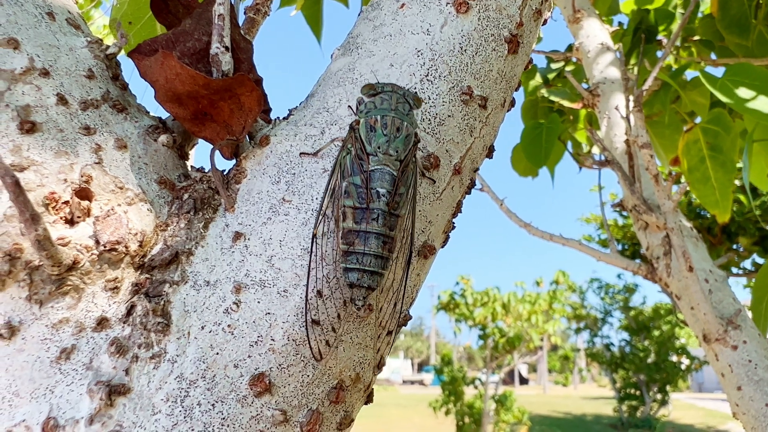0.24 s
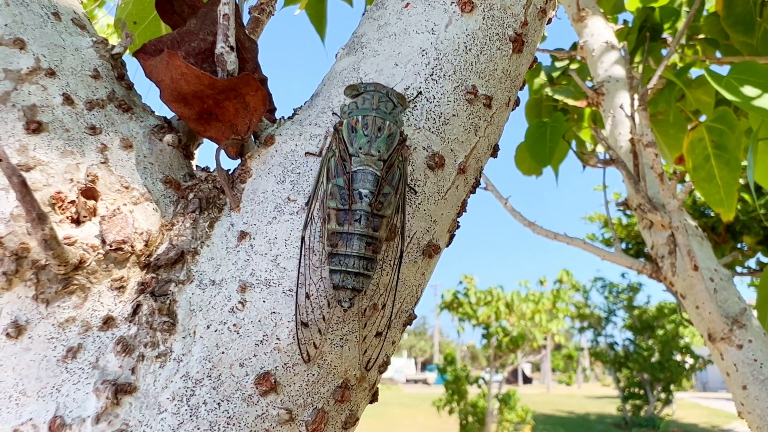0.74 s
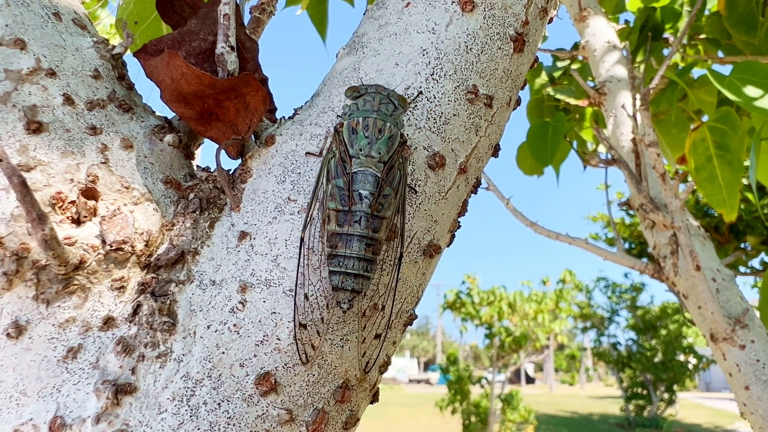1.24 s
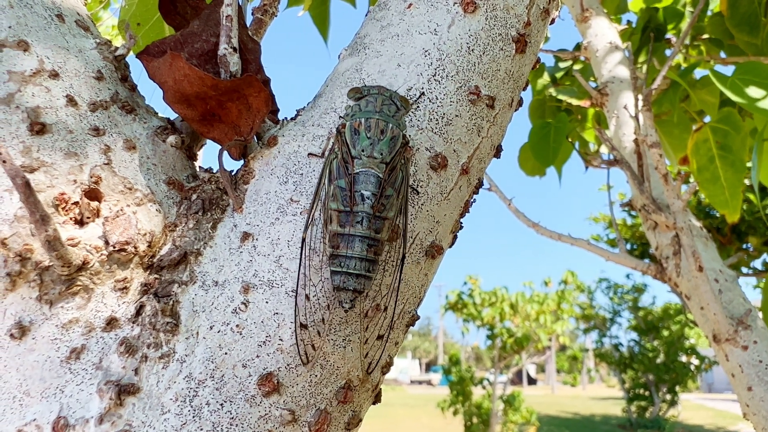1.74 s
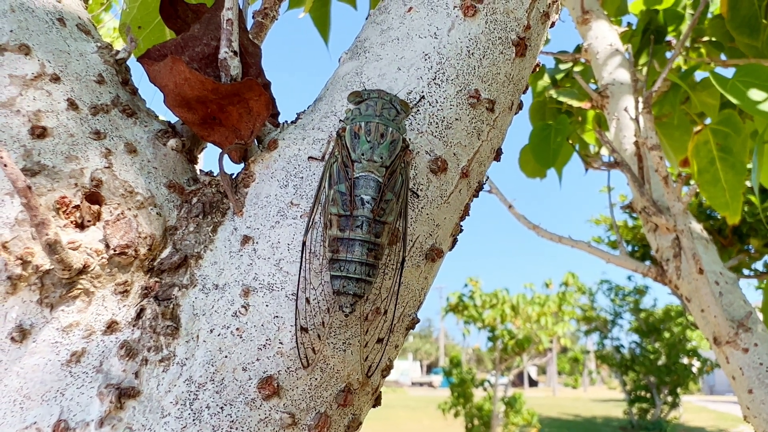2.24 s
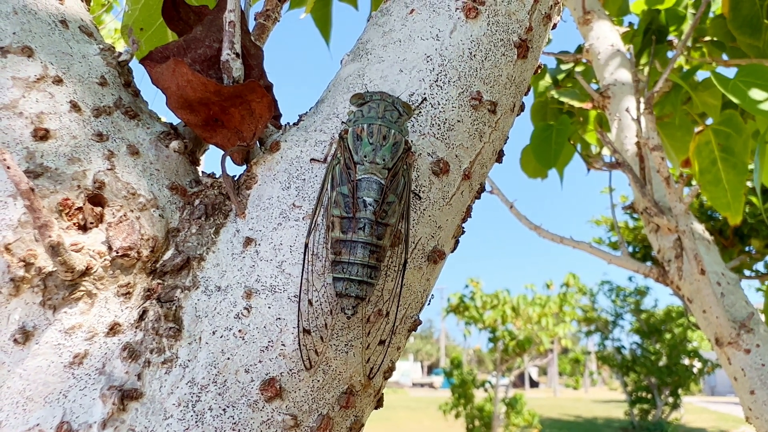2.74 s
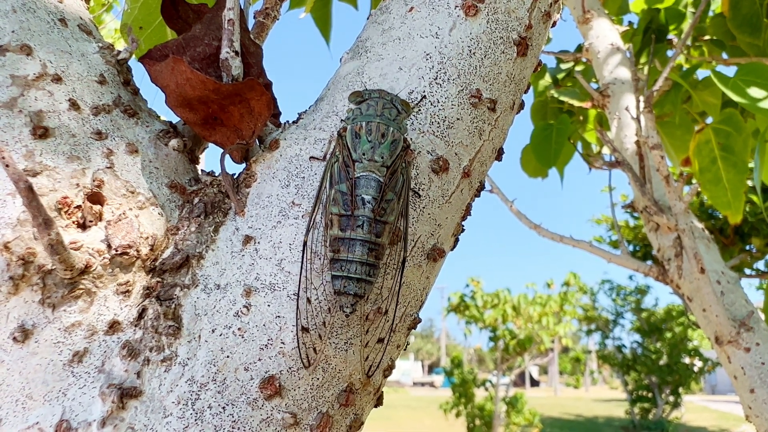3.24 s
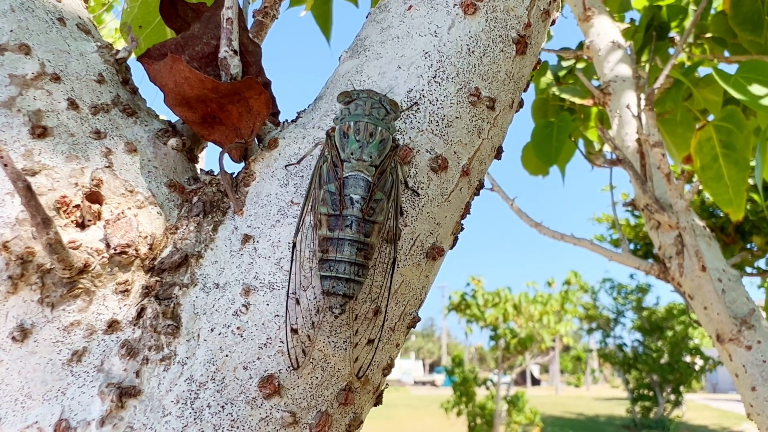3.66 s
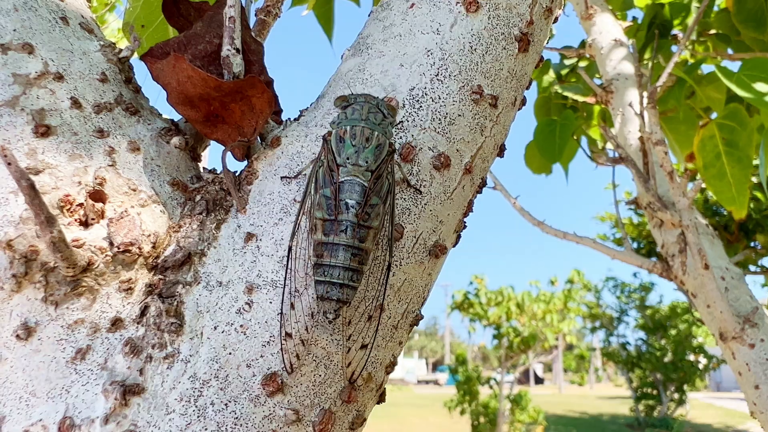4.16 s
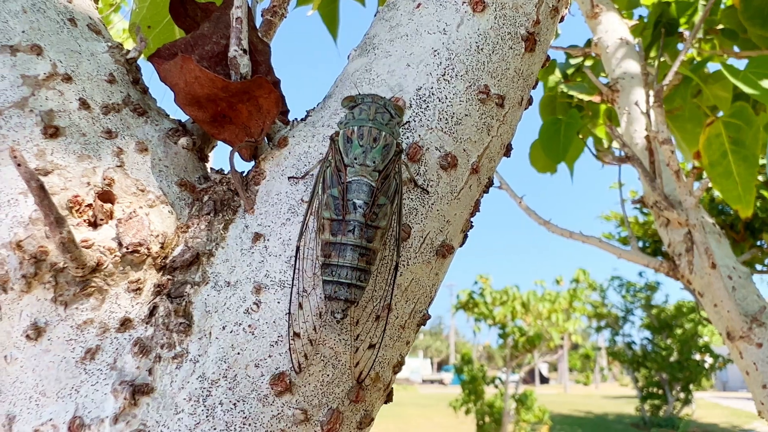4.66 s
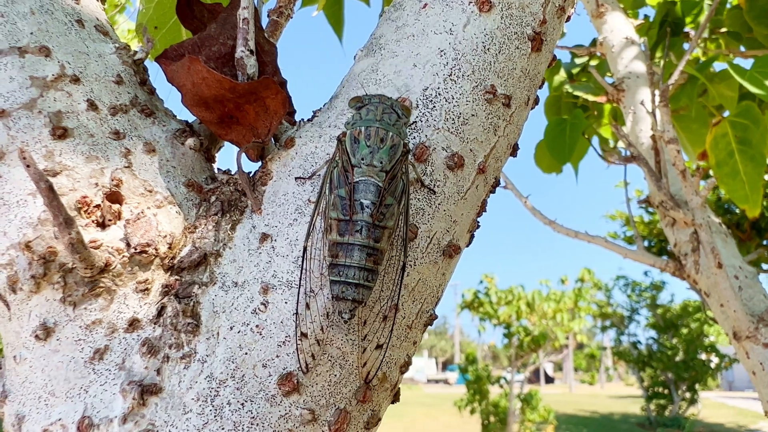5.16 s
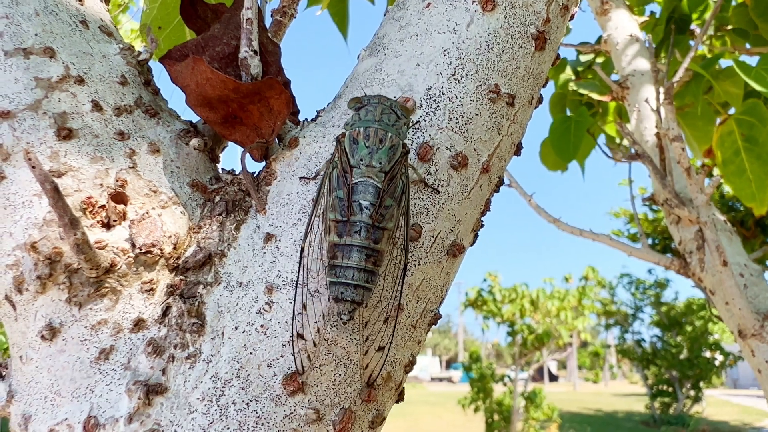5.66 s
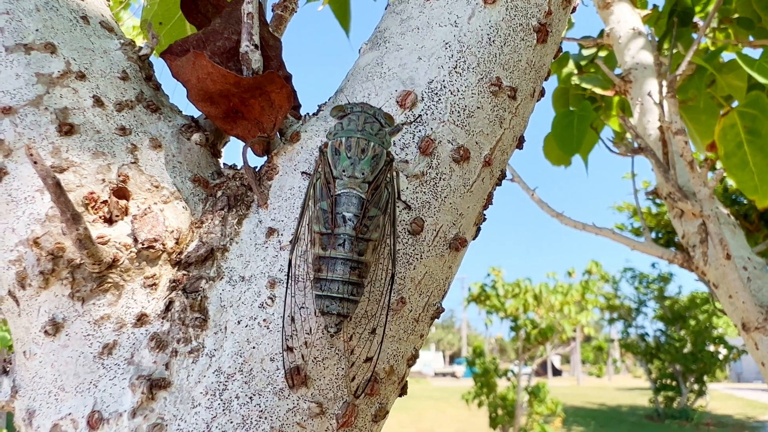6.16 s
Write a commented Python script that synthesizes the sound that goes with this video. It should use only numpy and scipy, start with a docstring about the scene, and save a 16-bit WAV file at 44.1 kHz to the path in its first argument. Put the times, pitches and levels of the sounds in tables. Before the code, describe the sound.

A single cicada sings close by on a tree trunk in a quiet park. From the start it makes a high, bright, rasping buzz of very rapid clicks. At about 1.4 seconds the buzz speeds up into a short, loud whine, then stops for a moment near 1.7 seconds. At 1.8 seconds a new phrase swells, throbs quickly and rolls, stutters from about 2.7 to 3.4 seconds, and settles into an even buzz. Around 5.2 seconds it sags slightly in pitch and strength, with a thin whistle ringing through. At about 5.5 seconds it rushes into a second loud whine, which breaks off near 5.8 seconds. A last phrase swells at 6 seconds and is still going at the end, about half a second later. Throughout, a very faint low rumble and the soft, steady hiss of far-off cicadas lie underneath.

```python
"""A cicada buzzes on a tree trunk, close by, over a faint low rumble and far-off cicadas in a park.
Its two tymbals buckle in turn, each stroke a volley of rib clicks that rings the hollow body.
At 1.4 s the buzz speeds up into a loud whine as the abdomen opens, then stops for a moment.
At 1.8 s a new phrase swells, throbs, rolls, stutters and settles into a buzz that sags before
the next whine at 5.5 s. After another stop, a last phrase swells at 6 s."""
import sys
import numpy as np
from scipy import signal
from scipy.fft import rfft, irfft
from scipy.io import wavfile
from scipy.ndimage import map_coordinates

SR = 44100
rng = np.random.default_rng(int(sys.argv[2]) if len(sys.argv) > 2 else 0)


def dump(signal):
    """Clip the signal to [-1, 1] and save it as 16-bit WAV at the path in sys.argv[1]."""
    limited = np.clip(np.atleast_2d(signal).T, -1, 1)
    pcm = np.round(limited * 32767).astype(np.int16)
    wavfile.write(sys.argv[1], SR, pcm)


N = 283122
TIME = np.arange(N) / SR


def from_db(db):
    """Decibels to gain."""
    return 10 ** (np.asarray(db) / 20)


def rms_one(x):
    """Scale to unit power."""
    return x / np.sqrt(np.mean(x ** 2) + 1e-20)


def curve(rows, t):
    """A two-column table interpolated at times t."""
    return np.interp(t, *np.transpose(rows))


def step(t, width_s):
    """Smooth rise from 0 to 1 around t = 0."""
    return .5 + .5 * np.tanh(t / width_s / 2)


def low_pass(x, hz, order):
    """Butterworth low-pass."""
    return signal.sosfilt(signal.butter(order, hz, fs=SR, output="sos"), x)


def high_pass(x, hz, order):
    """Butterworth high-pass: a small body radiates little below its resonances."""
    return signal.sosfilt(signal.butter(order, hz, "high", fs=SR, output="sos"), x)


def coloured_noise(spectrum):
    """Steady noise of a given colour, rms 1."""
    hz, db = np.transpose(spectrum)
    bins_hz = np.maximum(np.fft.rfftfreq(N, 1 / SR), 1)
    gain = from_db(np.interp(np.log(bins_hz), np.log(hz), db))
    return rms_one(irfft(rfft(rng.standard_normal(N)) * gain, N))


def resonate(x, modes):
    """Parallel resonances of alternating sign."""
    out = np.zeros(N)
    for k, (hz, width_hz, db) in enumerate(modes):
        r = np.exp(-np.pi * width_hz / SR)
        poles = [1, -2 * r * np.cos(2 * np.pi * hz / SR), r * r]
        out += (-1) ** k * from_db(db) * (1 - r * r) / 2 * signal.lfilter([1, 0, -1], poles, x + 1e-18)
    return out


def tensed(x, modes, strain):
    """Resonances that rise and sink with strain: a tenser body runs on a faster clock."""
    samples = np.arange(N)
    clock = np.cumsum(1 + strain) / np.mean(1 + strain)
    warped = map_coordinates(x, [np.interp(samples, clock, samples)], order=5)
    return map_coordinates(resonate(warped, modes), [clock], order=5)


# freq_hz, density_db
RUMBLE_SPECTRUM = [(15, -30), (25, -14), (55, 2.5), (112, 0), (144, 0.5), (233, -4), (541, -6.5), (900, -5),
                   (1170, -7), (1980, -120)]
# time_s, level_db
RUMBLE_LEVEL = [(0.0, -78), (0.37, -77), (0.95, -81), (1.38, -82), (2.11, -75), (2.25, -75), (2.61, -78),
                (5.58, -83), (5.81, -75), (6.42, -75)]


def low_rumble():
    """Faint low rumble that swells and ebbs."""
    return from_db(curve(RUMBLE_LEVEL, TIME)) * coloured_noise(RUMBLE_SPECTRUM)


# freq_hz, density_db
CHORUS_SPECTRUM = [(500, -50), (1000, -25), (1400, -15), (1900, -5), (2700, -19), (3600, 0), (4500, -6),
                   (5600, -3), (8000, -18), (15000, -31)]


def far_cicadas(level_db=-66):
    """Far-off cicadas merge into a steady hiss."""
    return from_db(level_db) * coloured_noise(CHORUS_SPECTRUM)


def reflections(song, t60_s=.05, dull_hz=9000, delay_s=.002, gain_db=-15):
    """Bark and leaves return many small, dulled echoes."""
    t = TIME[:SR // 2]
    echoes = rng.standard_normal(len(t)) * from_db(-60 * t / t60_s) * (t > delay_s)
    echoes = low_pass(echoes / np.sqrt(np.sum(echoes ** 2)), dull_hz, order=1)
    return from_db(gain_db) * signal.fftconvolve(song, echoes)[:N]


# times from the start of a phrase
ROLL_S, STUTTER_S, RUSH_S, FADE_S, STOP_S = .585, .62, 3.713, 3.96, 3.982
ROLL_WIDTH_S, RUSH_WIDTH_S, OPEN_WIDTH_S = .045, .021, .016
STROKE_S, TRAIL_GAP_S = .004, .0105
# start_s, swell_s, sag_tau_s
PHRASES = [(-2.311, .216, .33), (1.826, .216, .23), (5.963, .231, .2)]


def posture(t):
    """Time into the phrase, and depth (0-1) of the roll and of the sag before the whine."""
    starts_s, _, sag_tau_s = np.transpose(PHRASES)
    phrase = np.searchsorted(starts_s - TRAIL_GAP_S, t) - 1
    age_s = np.maximum(t - starts_s[phrase], 0)
    roll = np.exp(-((age_s - ROLL_S) / ROLL_WIDTH_S) ** 2)
    sag = np.exp(np.minimum(age_s - RUSH_S, 0) / sag_tau_s[phrase]) * step(RUSH_S - age_s, RUSH_WIDTH_S)
    return age_s, roll, sag


def openness(t):
    """How far the abdomen is open, 0-1."""
    age_s, opens_s = posture(t)[0], ABDOMEN_ENVELOPE[-1]
    return step(age_s - opens_s, OPEN_WIDTH_S)


def phrased(ring, envelope):
    """One body part's level through each phrase: swell, roll, sag, whine, fade."""
    base_db, tiring_db_per_s, soft_db, attack_s, roll_db, sag_db, *ending = envelope
    whine_db, fade_db_per_s, whine_s = ending
    age_s, roll, sag = posture(TIME)
    level_db = base_db + tiring_db_per_s * age_s + soft_db * np.exp(-age_s / attack_s)
    level_db += roll_db * roll + sag_db * sag
    level_db += whine_db * step(age_s - whine_s, OPEN_WIDTH_S)
    level_db += fade_db_per_s * np.maximum(age_s - FADE_S, 0)
    return rms_one(ring) * from_db(level_db)


def opening_bursts(start_s, swell_s, gap_s=.00385, throb_s=.0317, slowing_s=.0006):
    """A full-speed swell, slowing throbs, then a roll. Rows: start_s, strokes, gap_s."""
    throbs, throb_strokes = 8, 6
    bursts = [(start_s, round(swell_s / gap_s) - 2, gap_s)]
    t = start_s + swell_s
    for k in range(throbs):
        bursts.append((t, throb_strokes, gap_s))
        t += throb_s + k * slowing_s
    return bursts + [(t, round((start_s + STUTTER_S - t) / gap_s) - 2, gap_s)]


# time_s, pair_rate_hz
MUSCLE_PACE = [(0, 57.3), (0.3, 58.3), (0.45, 59.7), (0.9, 60.4), (1.15, 62.5), (1.35, 70.3), (1.7, 70.3),
               (2.4, 56.0), (3.4, 55.2), (3.5, 55.1), (3.65, 59.7), (3.8, 57.9), (4.0, 60.9), (4.2, 58.8),
               (4.45, 56.6), (5.1, 58.1), (5.47, 68.8)]
# start_s, strokes
STUMBLES = [(2.748, 4), (2.777, 4), (2.82, 4), (2.847, 4), (2.875, 6), (2.915, 4), (2.959, 4), (2.987, 4),
            (3.032, 4), (3.06, 4), (3.103, 4), (3.149, 4), (3.281, 4), (3.365, 4)]


def buzz_bursts(start_s, whine_hz=124.95, whine_top_s=3.89, arch_hz_per_s2=220, stumble_drag=1.12):
    """Stroke pairs stumble, settle, rush into the whine and trail off. Rows: start_s, strokes, gap_s."""
    buzz_phase, whine_phase, trail_strokes = .505, .462, 3
    bursts, t = [], max(start_s + STUTTER_S, 0)
    while t < start_s + STOP_S:
        age_s = t - start_s
        rush = step(age_s - RUSH_S, RUSH_WIDTH_S)
        buzz_hz = curve(MUSCLE_PACE, t + STROKE_S)
        arch_hz = whine_hz - arch_hz_per_s2 * (max(age_s, RUSH_S) - whine_top_s) ** 2
        pair_hz = buzz_hz + rush * (arch_hz - buzz_hz)
        # the second tymbal falls behind until the two alternate evenly
        lag_ms = 3.1 + 2.6 * max(age_s - STUTTER_S, 0) ** .72
        max_phase = buzz_phase + rush * (whine_phase - buzz_phase)
        lag_s = min(lag_ms / 1000, max_phase / pair_hz)
        t, count = next((row for row in STUMBLES if abs(row[0] - t) < .5 / pair_hz), (t, 2))
        bursts.append((t, count, lag_s))
        t += 1 / pair_hz + (count - 2) * lag_s * stumble_drag
    return bursts + [(t, trail_strokes, TRAIL_GAP_S)]


def strokes(opening_jitter_ms=.13, buzz_jitter_ms=.08, whine_jitter_ms=.02):
    """When a tymbal buckles, and which (+1, -1). Timing locks in as the abdomen opens."""
    rows = []
    for start_s, swell_s, _ in PHRASES:
        for bursts, jitter_ms in ((opening_bursts(start_s, swell_s), opening_jitter_ms),
                                  (buzz_bursts(start_s), buzz_jitter_ms)):
            for t, count, gap_s in bursts:
                rows += [(t + k * gap_s, (-1) ** k, jitter_ms) for k in range(count)]
    times_s, sides, jitter_ms = np.transpose([row for row in rows if 0 <= row[0] < N / SR - STROKE_S])
    jitter_ms += openness(times_s) * (whine_jitter_ms - jitter_ms)
    times_s += jitter_ms * rng.standard_normal(len(times_s)) / 1000
    return times_s[:, None], sides[:, None]


def tymbal_clicks(times_s, sides, strain, ribs=7, rib_hz=1878, quickening=.13, mismatch=.0084):
    """Ribs give way one after another, ever faster; the two tymbals differ a little."""
    pace_scatter, jitter_s, fade_db, side_db, uneven_db = .004, 6e-6, 1, .3, 2
    rib = np.arange(ribs)
    along = rib / (ribs - 1)
    stroke_strain = np.interp(times_s, TIME, strain)
    pace_hz = rib_hz * (1 + .9 * stroke_strain + pace_scatter * rng.standard_normal(times_s.shape))
    delay_s = rib * (1 + quickening * (1 - along)) / (pace_hz * (1 + mismatch * sides))
    time_noise, size_noise = rng.standard_normal((2, len(times_s), ribs))
    at_samples = (times_s + delay_s + jitter_s * time_noise) * SR
    focus = .13 + .31 * openness(times_s)   # gathers the force mid-stroke
    arch = np.sin(np.pi * (rib + 1) / (ribs + 1)) ** focus
    arch /= np.sqrt(np.mean(arch ** 2, axis=1, keepdims=True))
    size = arch * from_db(-fade_db * along + side_db * sides + uneven_db * size_noise)
    # windowed sinc: clicks fall between samples
    taps = np.floor(at_samples)[..., None] + np.arange(-7, 9)
    offset = taps - at_samples[..., None]
    pulses = size[..., None] * np.sinc(offset) * np.sinc(offset / 8)
    return np.bincount(np.clip(taps, 0, N - 1).astype(int).ravel(), pulses.ravel(), N)


# all modes: freq_hz, width_hz, gain_db
SAC_MODES = [(1560, 140, -16), (1815, 510, 9), (2180, 49, -11)]
# all envelopes: base_db, tiring_db_per_s, soft_db, attack_s, roll_db, sag_db,
# whine_db, fade_db_per_s, whine_s
SAC_ENVELOPE = (-33.8, -.7, -18, .046, 4.8, -5, 9.6, -170, 3.772)


def air_sac(clicks, strain):
    """The air sac rings lowest."""
    ring = high_pass(tensed(clicks, SAC_MODES, .8 * strain), hz=1440, order=5)
    return phrased(low_pass(ring, hz=2700, order=2), SAC_ENVELOPE)


PLATE_MODES = [(3308, 430, -2.5), (3665, 283, 6.5), (3944, 322, -0.5)]
PLATE_ENVELOPE = (-32.3, -.8, -34, .062, 4, -17, 13.5, -320, 3.772)


def tymbal_plates(clicks, strain):
    """The plates ring in the midrange and follow the strain only weakly."""
    ring = tensed(clicks, PLATE_MODES, .4 * strain)
    return phrased(high_pass(ring, hz=2500, order=3), PLATE_ENVELOPE)


RIB_MODES = [(5216, 123, 10), (5910, 132, 8), (6995, 640, 2.5), (8674, 980, -2), (11306, 810, 2),
             (12560, 555, 6.5), (14250, 1500, -4), (15780, 430, 1)]
RIB_ENVELOPE = (-25.2, -.9, -34, .036, -1.2, -3.8, -8, -130, 3.742)


def rib_snap(clicks, strain, notch_hz=9950, notch_width_hz=500):
    """The ribs' own bright ring: two groups of resonances with a gap between."""
    ring = high_pass(tensed(clicks, RIB_MODES, .75 * strain), hz=4500, order=4)
    notch = signal.iirnotch(notch_hz, notch_hz / notch_width_hz, fs=SR)
    return phrased(signal.lfilter(*notch, ring), RIB_ENVELOPE)


WHISTLE_MODES = [(5280, 70, 3), (7280, 90, -5), (8600, 100, -9), (12250, 110, 0), (13000, 120, -4),
                 (14300, 150, -8)]
WHISTLE_ENVELOPE = (-38.5, 0, -20, .04, -15, 8.5, -12, -130, 3.735)


def rib_whistle(clicks, strain):
    """Narrow rib modes ring on as a whistle while the body sags."""
    return phrased(tensed(clicks, WHISTLE_MODES, .95 * strain), WHISTLE_ENVELOPE)


ABDOMEN_MODES = [(2290, 130, 1.5), (3280, 200, 0), (4250, 200, -2), (4700, 170, -1), (5200, 170, -5)]
ABDOMEN_ENVELOPE = (-44, -1.1, -12, .04, 3, 2, 23.5, -500, 3.785)


def abdomen(clicks):
    """The abdomen rings loudly once it opens: the whine."""
    ring = high_pass(resonate(clicks, ABDOMEN_MODES), hz=1200, order=2)
    return phrased(low_pass(ring, hz=5700, order=4), ABDOMEN_ENVELOPE)


def cicada(start_slack=.08, tensing_s=.09, roll_strain=.04, sag_slack=.05):
    """One train of rib clicks drives every part of a body that tenses and slackens."""
    times_s, sides = strokes()
    age_s, roll, sag = posture(TIME)
    strain = roll_strain * roll - start_slack * np.exp(-age_s / tensing_s) - sag_slack * sag
    clicks = tymbal_clicks(times_s, sides, strain)
    body = sum(part(clicks, strain) for part in (air_sac, tymbal_plates, rib_snap, rib_whistle))
    duty = len(times_s) * STROKE_S / (N / SR)
    return np.sqrt(duty) * (body + abdomen(clicks))


def scene():
    """The song and its reflections over the quiet park, the same in both ears."""
    song = cicada()
    return np.tile(song + reflections(song) + low_rumble() + far_cicadas(), (2, 1))


def record(dry, cutoff_hz=15900):
    """Steep treble cut."""
    return signal.sosfilt(signal.ellip(12, .1, 80, cutoff_hz, fs=SR, output="sos"), dry)


dry = scene()
out = record(dry)
dump(out)
```